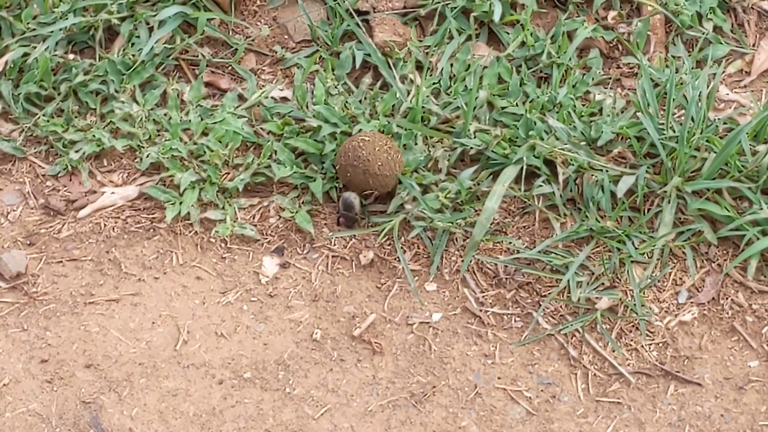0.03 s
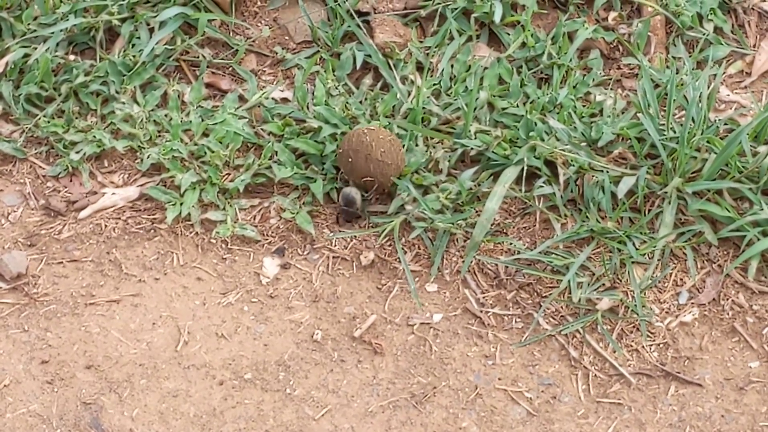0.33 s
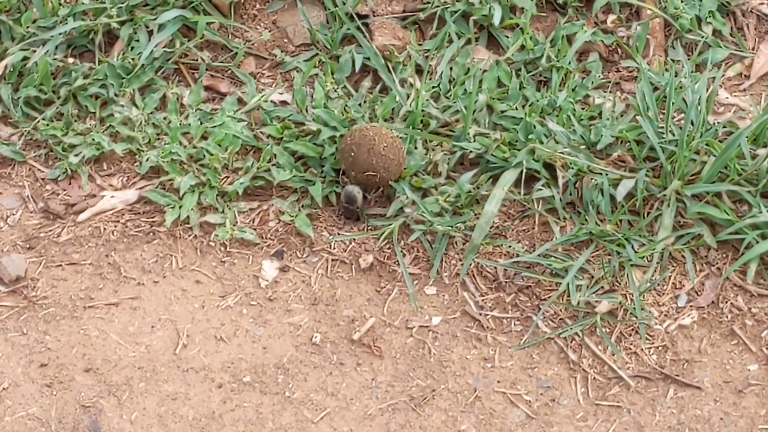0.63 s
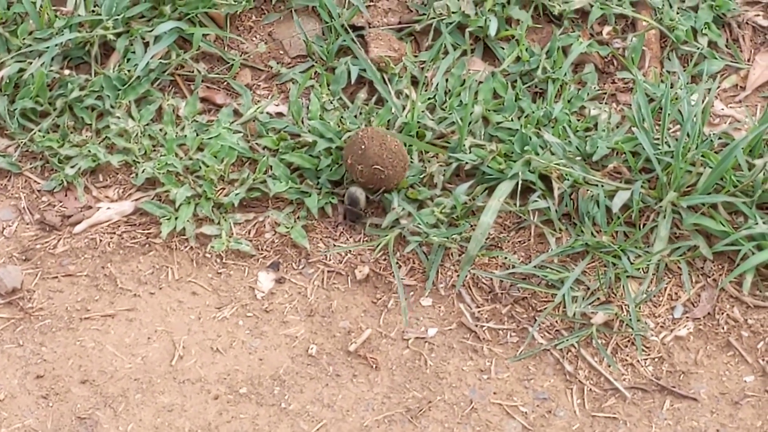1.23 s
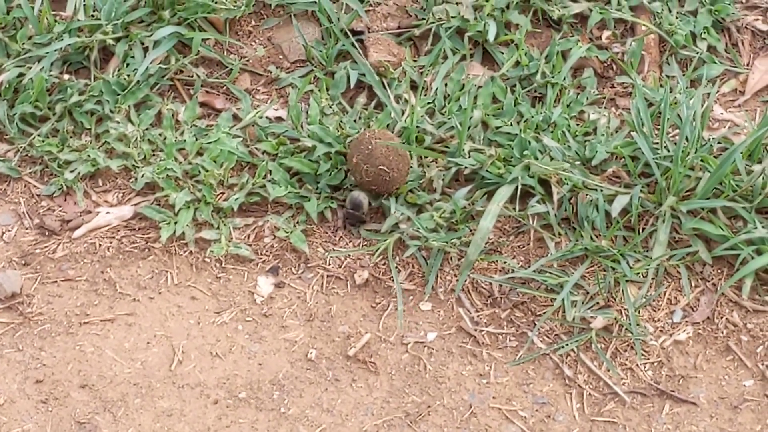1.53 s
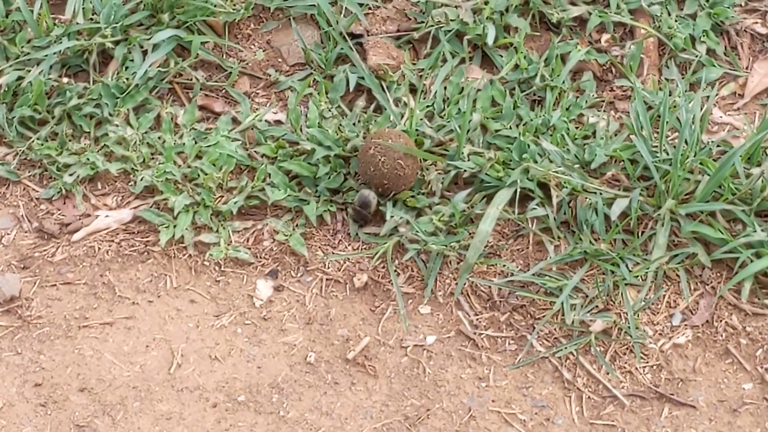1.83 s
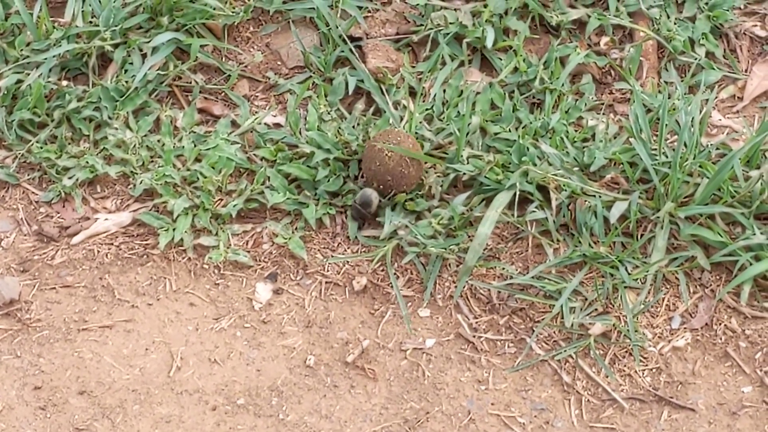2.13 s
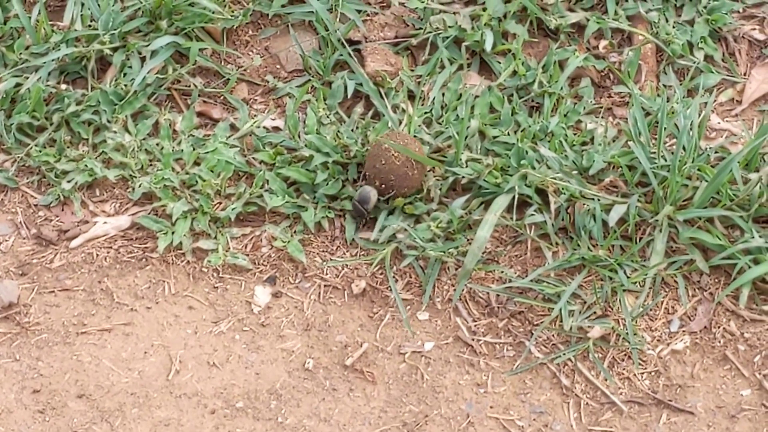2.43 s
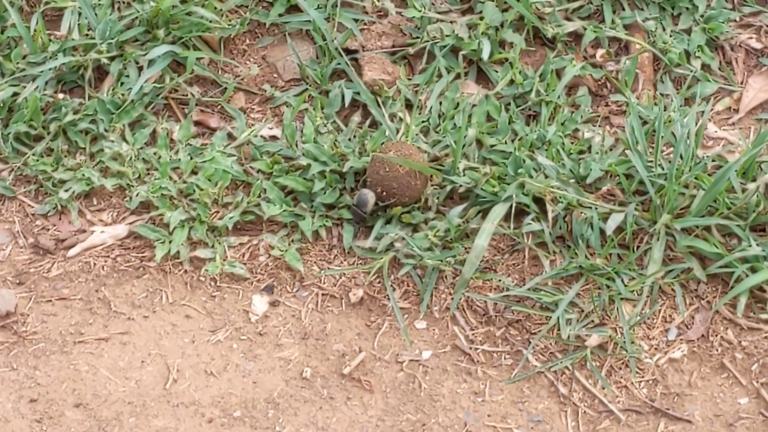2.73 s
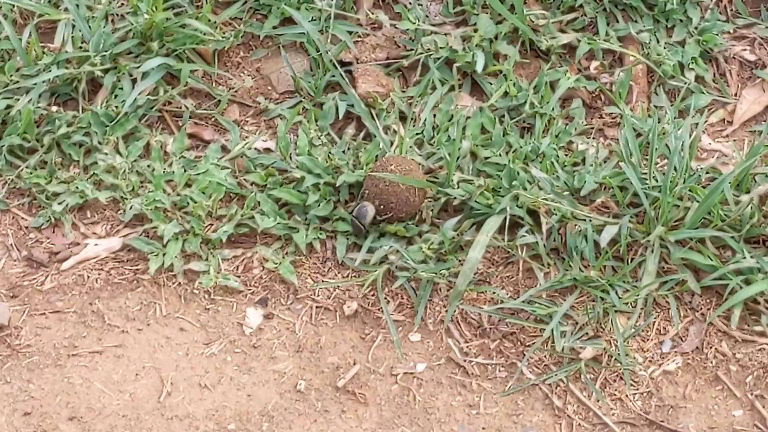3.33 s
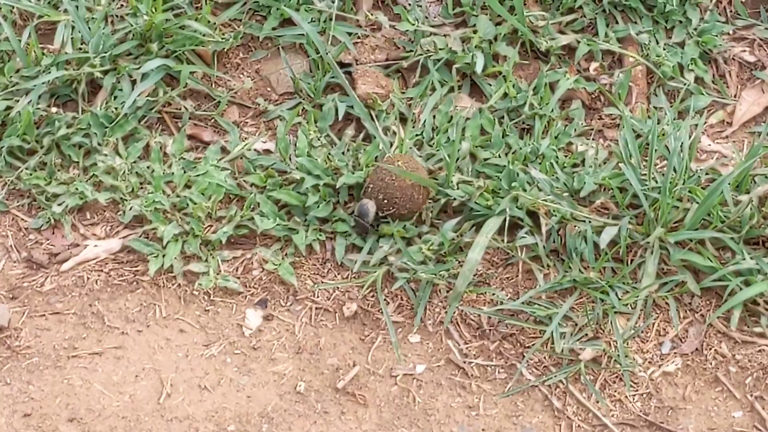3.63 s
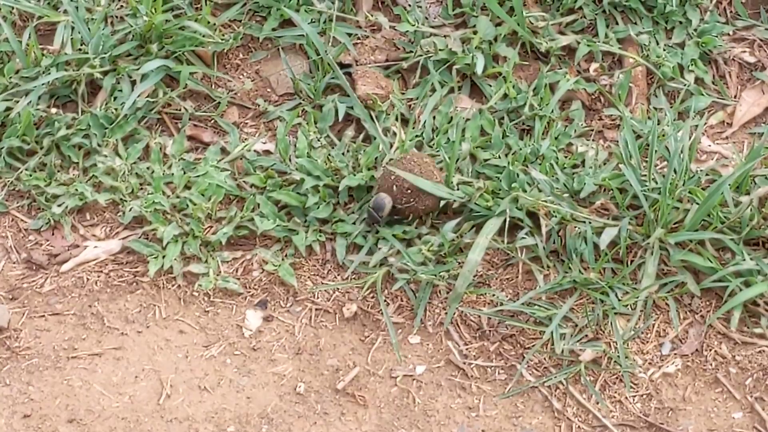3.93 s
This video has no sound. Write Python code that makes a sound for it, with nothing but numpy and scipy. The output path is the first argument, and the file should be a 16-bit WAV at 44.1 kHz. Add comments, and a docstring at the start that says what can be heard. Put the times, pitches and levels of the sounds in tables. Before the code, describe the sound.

Low, fluttering wind noise hits the microphone, with one stronger gust over soft hiss.

```python
"""Grassy verge: a breeze tumbles over the two ports of a camera microphone.
Eddies make each port rumble and flutter on its own. Vortices break as sharp buffets, mostly on the
windward left port, hardest in a gust near 2.8 s. Behind lie a steady outdoor hiss and a faint hum
like a far idling engine; gain control dips the whole mix under the wind."""
import sys
import numpy as np
from scipy import signal
from scipy.fft import rfft, irfft
from scipy.io import wavfile
from scipy.ndimage import uniform_filter1d

SR = 44100
rng = np.random.default_rng(int(sys.argv[2]) if len(sys.argv) > 2 else 0)


def transcribe(signal):
    """Save signal, clipped to [-1, 1], as a 16-bit WAV file at the path in sys.argv[1]."""
    frames = np.atleast_2d(signal).T
    limited = np.clip(frames, -1, 1)
    pcm = np.round(limited * 32767).astype(np.int16)
    wavfile.write(sys.argv[1], SR, pcm)


N = 176400
TIME = np.arange(N) / SR


def wind():
    """Rumble of large eddies and flutter of small ones, following the wind at each port."""
    # wind strength per port: t/s, level/dB
    left_strength = [(0, -36.5), (.05, -33.5), (.14, -53), (.25, -44), (.28, -25), (.58, -32.5),
                     (.68, -26.5), (.88, -28.5), (1.02, -23.5), (1.2, -28.5), (1.44, -29), (1.6, -30.5),
                     (1.8, -35), (1.94, -27.5), (2.0, -45), (2.1, -36), (2.18, -29), (2.4, -27), (2.6, -29),
                     (2.8, -20.5), (2.97, -22), (3.1, -23), (3.38, -29.5), (3.56, -27.5), (3.66, -34.5),
                     (3.9, -28), (4, -34)]
    right_strength = [(0, -42.5), (.28, -51), (.38, -25.5), (.5, -42), (.6, -47), (.7, -39), (.78, -43),
                      (.86, -36), (1.1, -33), (1.2, -48), (1.3, -32), (1.42, -31.5), (1.65, -27),
                      (1.72, -38), (1.9, -31), (2.12, -47), (2.22, -37.5), (2.44, -33), (2.56, -32),
                      (2.9, -23), (3.12, -24), (3.42, -35), (3.6, -27.5), (3.73, -28.5), (3.78, -37.5),
                      (4, -31)]
    # large- and small-eddy spectra: f/Hz, relative density/dB
    rumble_spectrum = [(10, -24), (26, -0.5), (45, -1), (80, 1.5), (130, -5.5), (200, -10), (300, -23),
                       (500, -29.5), (900, -70), (2000, -100)]
    flutter_spectrum = [(40, -32), (120, -7), (220, 3.5), (320, -1.5), (450, -11), (700, -17.5),
                        (1000, -25.5), (1500, -33), (3000, -76)]
    usual_wind_db, flutter_db_per_db = -25.5, 1.53  # flutter grows faster than rumble
    ports = []
    for strength, usual_flutter_db in (left_strength, -37.5), (right_strength, -33.5):
        wind_db = np.interp(TIME, *np.transpose(strength))
        flutter_db = usual_flutter_db + flutter_db_per_db * (wind_db - usual_wind_db)
        rumble = gain_of(wind_db + 2.5) * eddies(rumble_spectrum, lumps_db=4, lumps_hz=22)
        flutter = gain_of(flutter_db) * eddies(flutter_spectrum, lumps_db=4.5, lumps_hz=46.5)
        ports.append(rumble + flutter)
    return np.array(ports)


def eddies(spectrum, lumps_db, lumps_hz):
    """Turbulent pressure: noise in quick lumps about a steady mean strength."""
    pressure = noise(spectrum) * gain_of(lumps_db * wander(lumps_hz))
    power = uniform_filter1d(uniform_filter1d(pressure ** 2, size=2600), size=2600)
    return pressure / np.sqrt(abs(power) + 1e-9)


def buffet(length_s, level_db, width_hz):
    """A vortex breaks on a port: a leading pressure spike, then an uneven run in churning air."""
    rise_s, fall_s, fade_db = 0.001873, 0.0061, 3.5
    spikes_per_s, lead_db, spread_db = 160, 2, 4.5
    t = np.arange(0, length_s + fall_s, 1 / SR)
    jitter, size = rng.standard_normal((2, 32))
    gaps_s = np.exp(0.602 * jitter) / spikes_per_s
    onsets_s = rise_s + np.cumsum(gaps_s) - gaps_s[0]
    heights = gain_of(np.r_[lead_db, spread_db * size[1:]])
    spikes = np.bincount((onsets_s * SR).astype(int), heights, len(t))[:len(t)]
    churn = 0.46 * rng.standard_normal(SR)[:len(t)]
    drive = unit_rms(spikes - spikes.mean()) + churn
    ramps = np.clip(np.minimum(t / rise_s, (t[-1] - t) / fall_s), 0, 1)
    envelope = ramps * gain_of(-fade_db * t / t[-1])
    blow = signal.fftconvolve(drive * envelope, port_response(width_hz))
    return gain_of(level_db + 1) * blow * np.sqrt(length_s * SR / np.sum(blow ** 2))


def port_response(width_hz, size=4096):
    """Response to a pressure spike: a rounded peak, then an undershoot from the bass cut."""
    bass_cut_hz, damping = 97, 1.38
    hz = abs(np.fft.fftfreq(size, 1 / SR))
    s = 1j * hz / bass_cut_hz
    bass_cut = abs(s * s / (s * s + damping * s + 1))
    roll_off = gain_of(-20 * (hz / width_hz) ** 1.152)
    log_gain = np.log(bass_cut * roll_off + 1e-5)
    minimum_phase = np.exp(np.conj(signal.hilbert(log_gain)))
    return np.fft.ifft(minimum_phase).real[:size // 2]


def shove(buffet_s, buffet_db):
    """Slow push of air under a buffet: one pressure swing, either way first."""
    usual_shove_db, usual_buffet_db = -26, -22.5
    swing_s = 0.017 + 0.31 * buffet_s
    swing_db = usual_shove_db + 0.7 * (buffet_db - usual_buffet_db)
    progress = np.arange(0, 1, 1 / (SR * swing_s))
    swing = np.sin(2 * np.pi * progress) * np.sin(np.pi * progress)
    return rng.choice([-1, 1]) * gain_of(swing_db) * unit_rms(swing)


def outdoor_hiss():
    """Diffuse hiss: independent noise per port, a little louder on the right."""
    # hiss spectrum: f/Hz, relative density/dB
    spectrum = [(20, 18.5), (100, 11.5), (200, 17.5), (350, 14), (550, 7.5), (800, 3), (1150, 1),
                (1450, -1), (2300, -1.5), (2700, 0), (3600, -1), (4200, -6), (5400, -6.5), (7400, -12.5),
                (9000, -11), (11000, -12.5), (15500, -19)]
    # hiss strength on the left: t/s, level/dB
    strength = [(0, -45.5), (0.22, -46), (1.0, -45.5), (1.5, -46.5), (2.08, -46), (2.17, -45),
                (2.75, -45.5), (3.0, -45), (3.3, -45.5), (3.52, -44.5), (4, -45.5)]
    right_db = 1.5
    hiss = np.array([noise(spectrum), gain_of(right_db) * noise(spectrum)])
    return gain_of(np.interp(TIME, *np.transpose(strength))) * hiss


def engine_hum():
    """Hum as of a far idling engine: low partials wavering together in pitch."""
    # engine partials: f/Hz, level/dB
    partials = [(28.3, -43), (85, -50.5), (113, -42.5), (168, -52), (285, -53)]
    clock_s = np.cumsum(1 + 0.015 * wander(rate_hz=6.26)) / SR
    return sum(gain_of(db) * np.sin(2 * np.pi * (hz * clock_s + rng.random())) for hz, db in partials)


def noise(spectrum):
    """Unit-rms noise shaped by rows of f/Hz, density/dB."""
    knots_hz, knots_db = np.transpose(spectrum)
    hz = np.fft.rfftfreq(N, 1 / SR)
    shape = gain_of(np.interp(np.log(hz + 1), np.log(knots_hz), knots_db))
    return unit_rms(irfft(rfft(rng.standard_normal(N)) * shape, N))


def wander(rate_hz):
    """Smooth unit-rms random drift, up to about rate_hz."""
    hz = np.fft.rfftfreq(N, 1 / SR)
    shape = hz / (hz + rate_hz / 10) * np.exp(-(hz / rate_hz) ** 2)
    return unit_rms(irfft(rfft(rng.standard_normal(N)) * shape, N))


def gain_of(db):
    """Decibels to amplitude gain."""
    return 10 ** (np.asarray(db) / 20)


def unit_rms(x):
    """Scale to rms 1."""
    return x / np.sqrt(np.mean(x ** 2) + 1e-20)


def add(mix, start_s, sound):
    """Mix a sound in at start_s."""
    part = mix[max(round(start_s * SR), 0):][:len(sound)]
    part += sound[:len(part)]


def scene():
    """Wind and buffets at both ports over hiss and hum."""
    # vortex hits: t/s, length/s, level/dB, width at 20 dB down/Hz, port (0 left, 1 right)
    buffets = [(.261, 0.014, -21, 690, 0), (0.284, 0.019, -21.5, 440, 0), (.317, 0.0088, -20.5, 620, 0),
               (0.35, 0.013, -22, 516, 0), (0.361, 0.012, -33, 620, 1), (0.393, .016, -31.5, 672, 1),
               (0.455, 0.0076, -24, 328, 0), (.493, 0.0076, -21, 747, 0), (0.51, .004, -19.5, 550, 0),
               (0.546, 0.013, -30, 482, 0), (0.639, 0.0059, -26.5, 680, 0), (0.655, .012, -23, 580, 0),
               (.705, .006, -32, 440, 1), (.740, 0.0052, -19.5, 574, 0), (0.823, 0.002, -16.5, 475, 0),
               (0.828, 0.0049, -27, 580, 0), (0.862, 0.01, -33.5, 602, 1), (0.98, 0.012, -22.5, 353, 0),
               (1.016, 0.0084, -23, 373, 0), (1.052, 0.017, -43, 570, 1), (1.111, 0.0053, -21, 680, 0),
               (1.125, .008, -23, 520, 0), (1.258, 0.0055, -30, 480, 1), (1.274, 0.0045, -25.5, 420, 1),
               (1.34, 0.044, -30.5, 298, 0), (1.404, 0.038, -25.5, 350, 1), (1.447, 0.01, -29.5, 620, 1),
               (1.501, 0.0066, -21.5, 340, 0), (1.58, 0.0081, -33, 562, 1), (1.651, 0.015, -30, 382, 1),
               (1.735, 0.015, -25.5, 433, 0), (1.827, 0.0052, -23.5, 336, 0), (1.89, .006, -29.5, 472, 0),
               (1.929, 0.015, -23, 340, 0), (1.945, 0.0062, -21.5, 405, 0), (1.971, 0.0036, -27, 720, 1),
               (1.991, 0.0032, -31.5, 650, 1), (2.298, 0.0088, -25, 402, 0), (2.332, 0.023, -29.5, 386, 0),
               (2.435, 0.0078, -23.5, 800, 0), (2.444, .008, -15, 468, 0), (2.522, 0.0064, -17.5, 500, 0),
               (2.545, 0.0057, -22.5, 742, 0), (2.648, 0.038, -26.5, 577, 0), (2.719, 0.0071, -16, 990, 0),
               (2.729, 0.0095, -15.5, 869, 0), (2.782, 0.0079, -19, 750, 0), (2.788, 0.0075, -8.5, 632, 0),
               (2.803, 0.0025, -14.5, 1200, 0), (2.813, 0.0075, -15, 820, 0), (2.838, 0.039, -21, 693, 0),
               (2.845, .005, -28, 750, 1), (2.86, .008, -18, 1200, 0), (2.871, 0.01, -12, 890, 0),
               (2.885, 0.026, -14, 720, 0), (2.921, 0.03, -25, 623, 0), (2.927, 0.032, -29, 640, 1),
               (2.953, 0.014, -18, 777, 0), (2.961, 0.033, -23, 604, 1), (2.967, 0.015, -10, 674, 0),
               (3.017, 0.0097, -29, 560, 1), (3.022, 0.013, -16, 586, 0), (3.083, 0.0033, -18.5, 680, 0),
               (3.1, 0.016, -19.5, 470, 0), (3.13, 0.014, -21, 400, 1), (3.181, 0.0042, -19.5, 660, 0),
               (3.297, 0.0076, -28, 662, 1), (3.423, 0.0073, -27, 330, 0), (3.539, .02, -25, 426, 0),
               (3.912, .014, -28.5, 431, 0)]
    ports = wind()
    for start_s, length_s, level_db, width_hz, port in buffets:
        add(ports[port], start_s, buffet(length_s, level_db, width_hz))
        add(ports[port], start_s, shove(length_s, level_db))
    return ports + outdoor_hiss() + engine_hum()


def record(dry):
    """Gentle gain control shared by both channels, make-up gain, then the band limit."""
    threshold_db, duck_db_per_db, make_up_db = -39, 0.15, 2
    sense_s, lag_s, release_db_per_s = 0.013, 0.092, 16.5
    edge_hz = 15750
    power = abs(uniform_filter1d((dry ** 2).mean(0), size=round(sense_s * SR)))
    release_db = TIME * release_db_per_s
    held_db = np.maximum.accumulate(10 * np.log10(power + 1e-12) + release_db) - release_db
    over_db = np.maximum(held_db - threshold_db, 0)
    pole = np.exp(-1 / (lag_s * SR))
    duck_db = duck_db_per_db * signal.lfilter([1 - pole], [1, -pole], over_db)
    ducked = dry * gain_of(make_up_db - duck_db)
    low_pass = signal.firwin(511, edge_hz, window=("kaiser", 9), fs=SR)
    return signal.oaconvolve(ducked, low_pass[None], "same")


dry = scene()
out = record(dry)
transcribe(out)
```